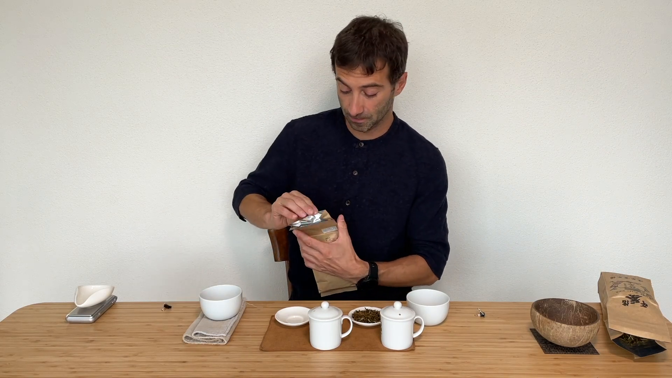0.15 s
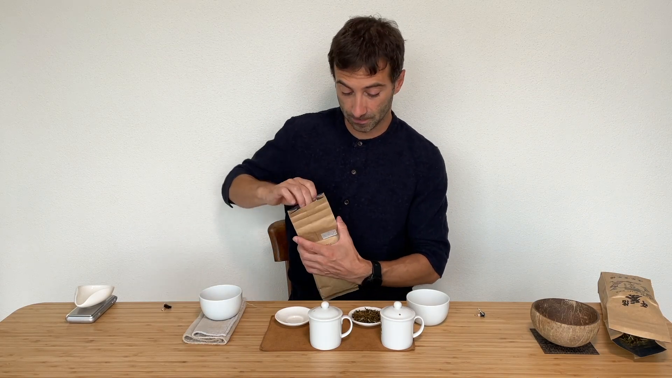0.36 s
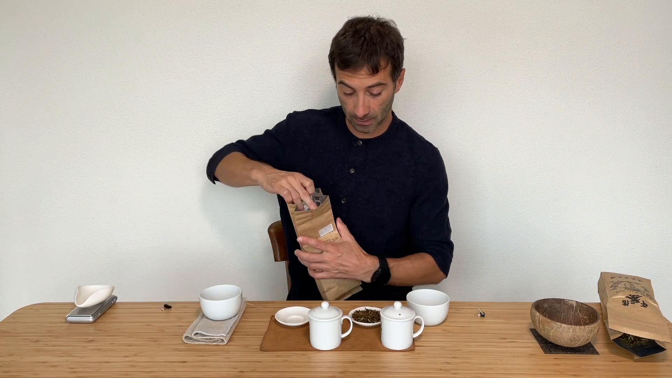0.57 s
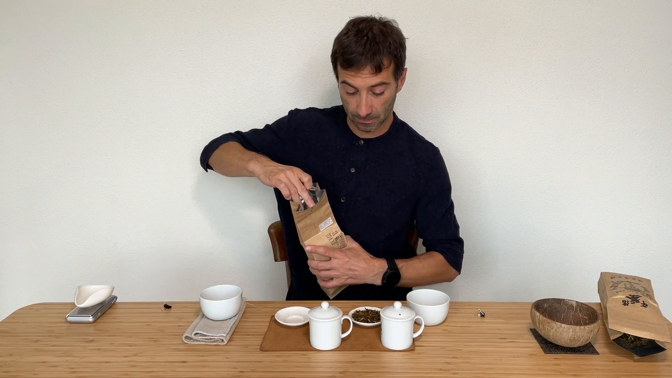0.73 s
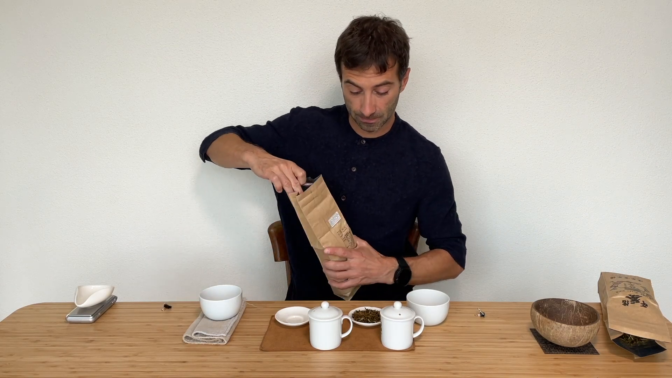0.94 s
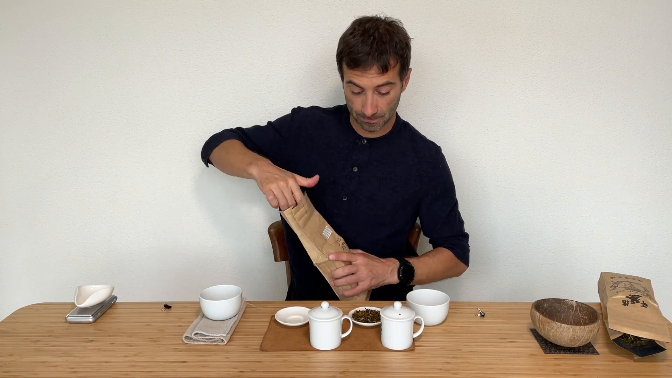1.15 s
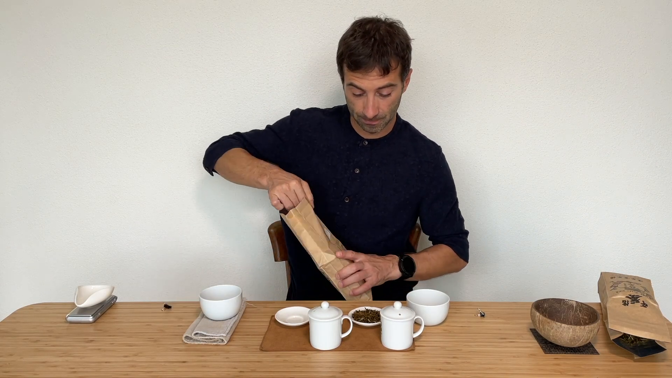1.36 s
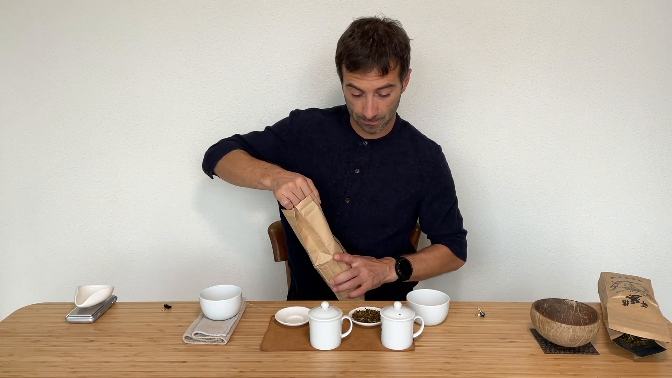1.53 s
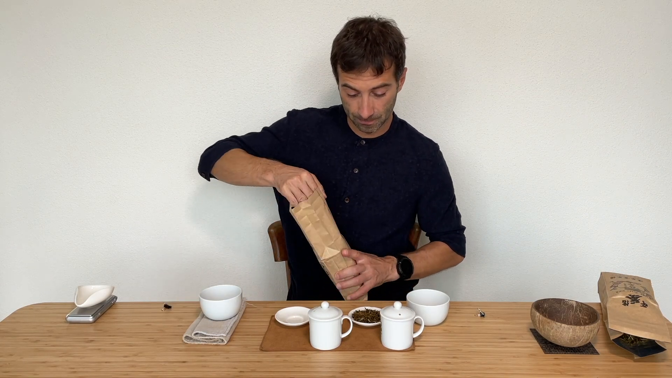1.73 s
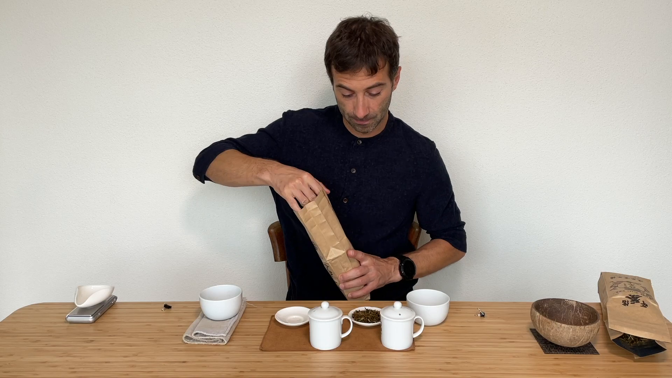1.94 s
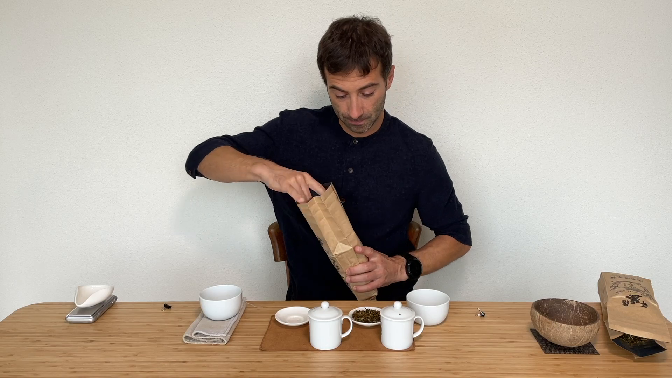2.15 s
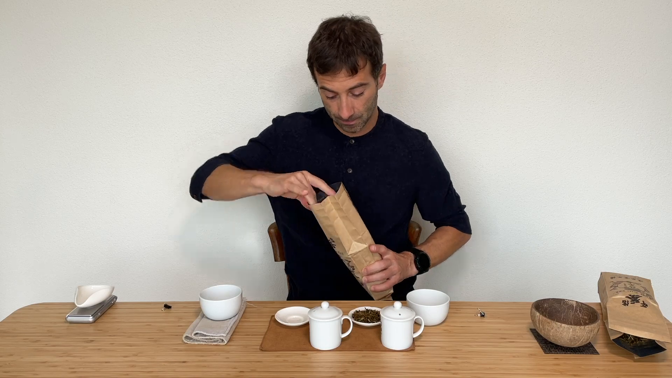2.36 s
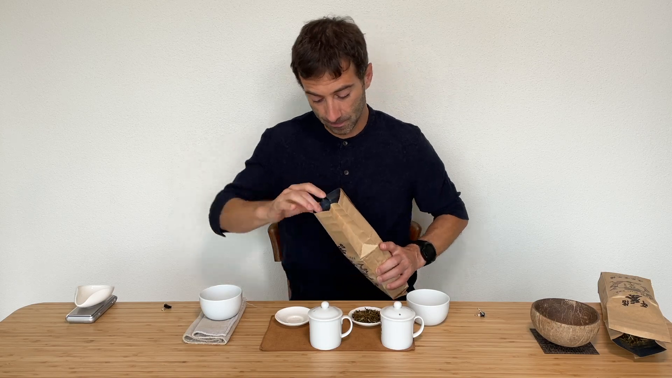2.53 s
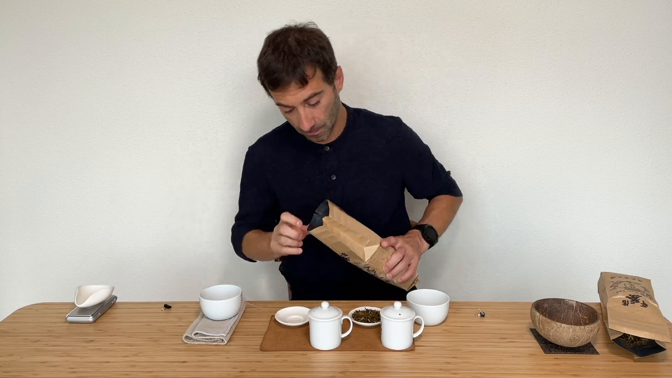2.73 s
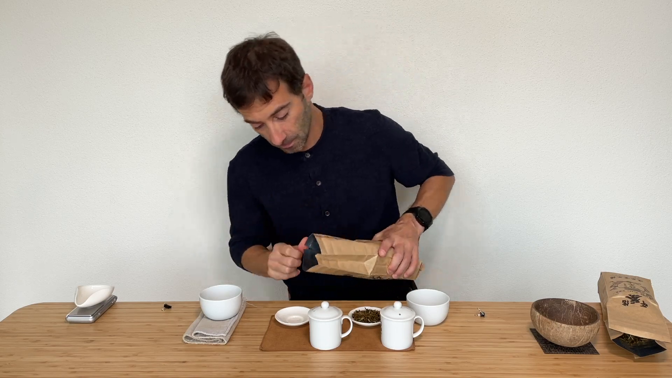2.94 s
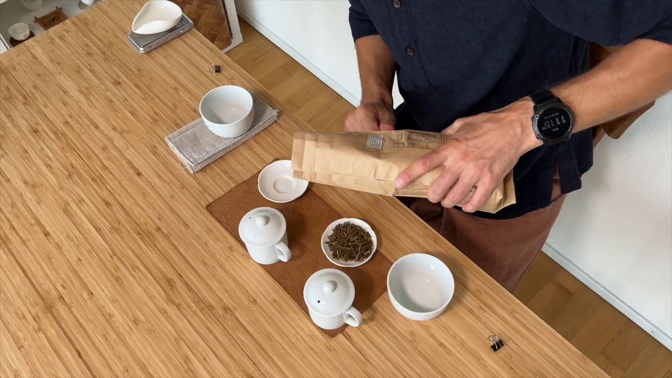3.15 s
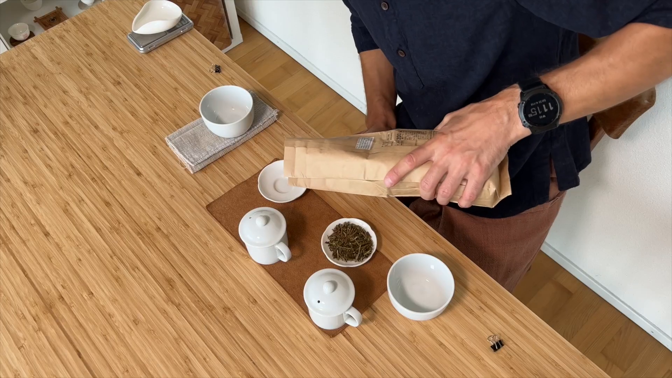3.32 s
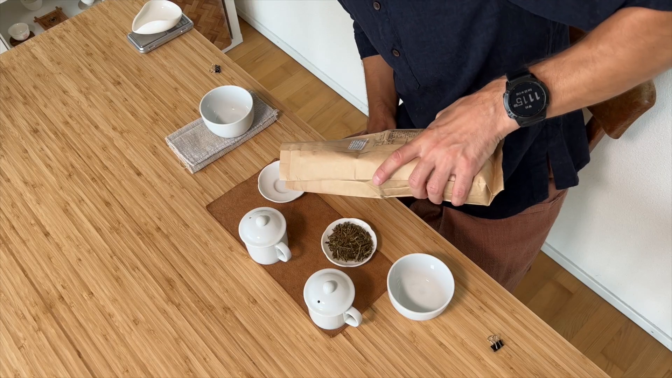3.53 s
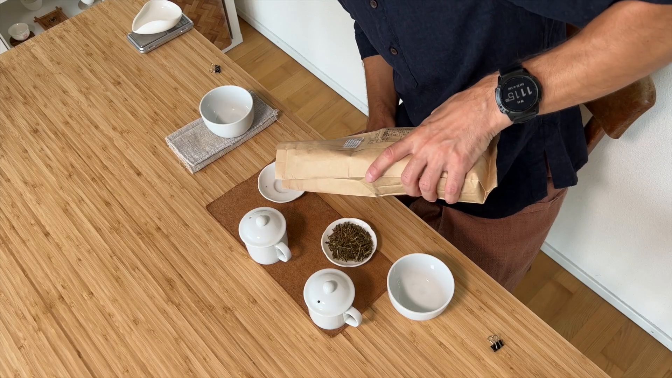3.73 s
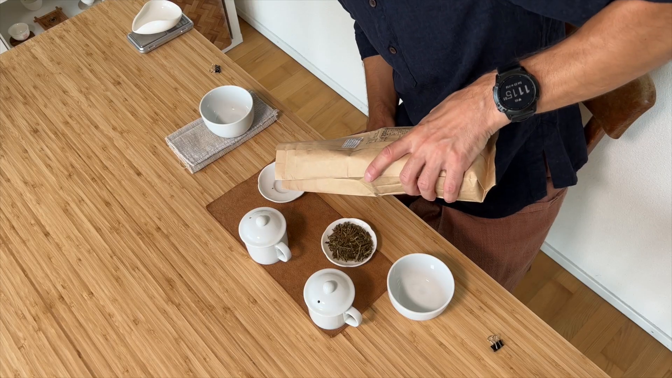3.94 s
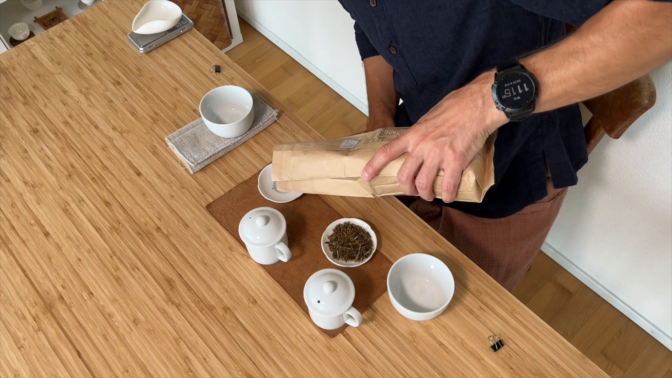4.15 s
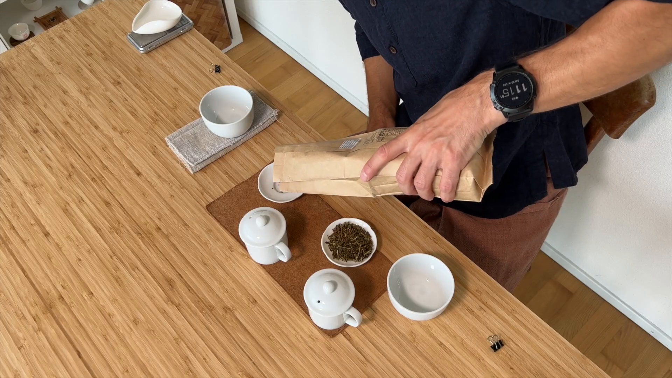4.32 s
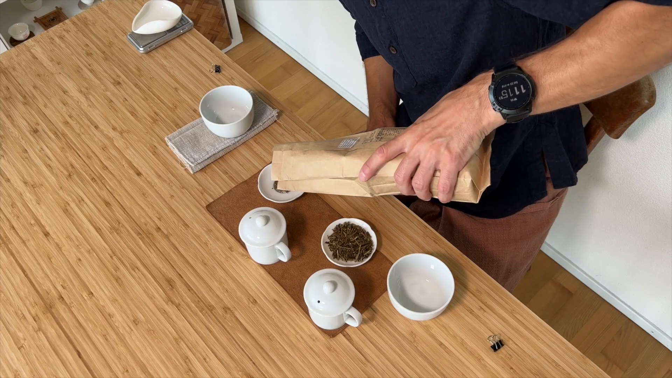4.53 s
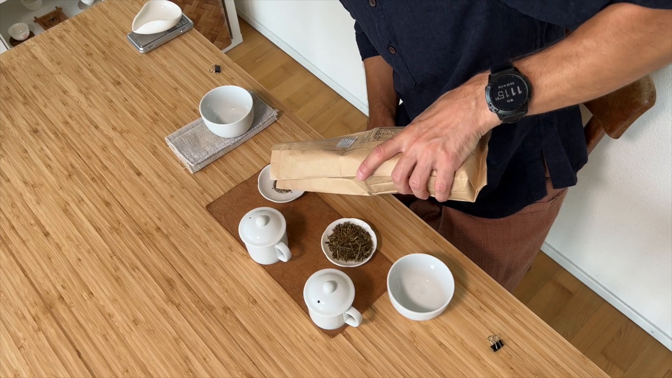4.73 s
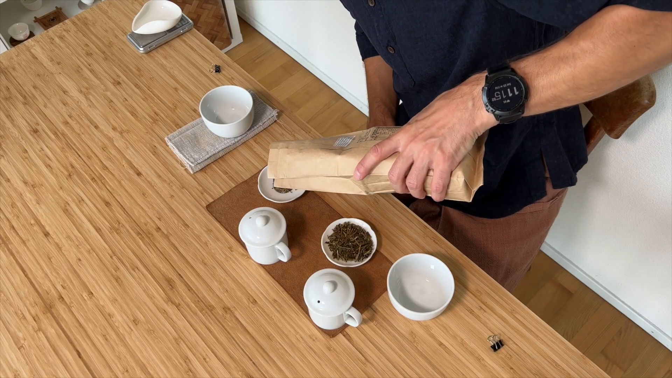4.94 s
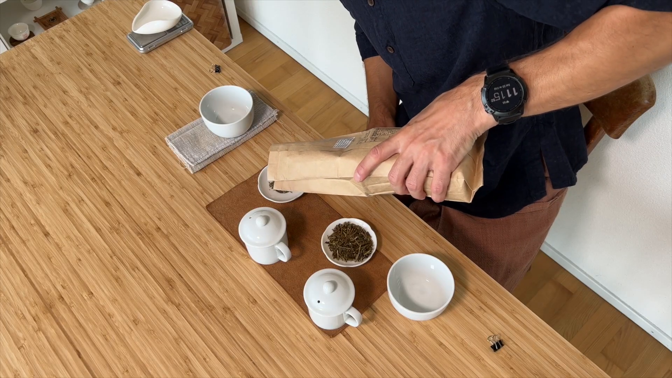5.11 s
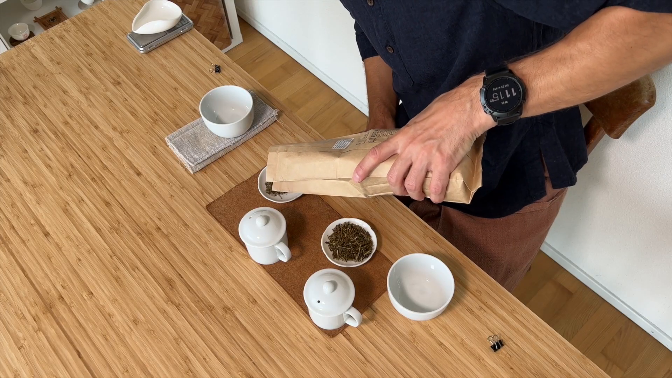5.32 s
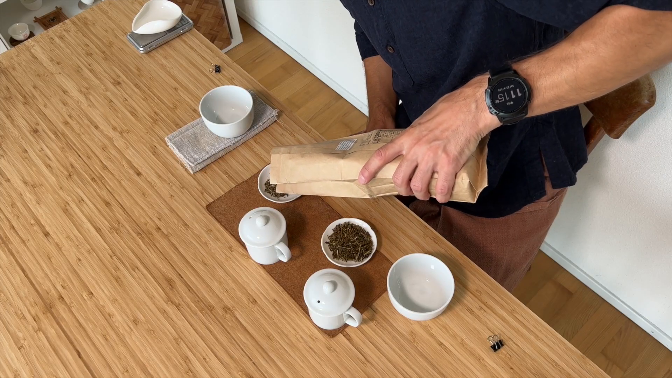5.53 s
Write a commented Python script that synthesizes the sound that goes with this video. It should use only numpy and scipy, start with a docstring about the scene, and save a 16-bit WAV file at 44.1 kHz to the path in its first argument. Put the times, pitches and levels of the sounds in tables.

```python
"""A stiff paper bag of dry tea leaves is unrolled and pulled open at a table in a bare room.
Creases snap in short noise bursts, panels flex and rustle in many tiny ticks, and echoes follow.
Then the bag is tipped: leaves slide down the paper and are shaken out in quick strokes, made of
finer ticks that surge with each movement. A low hum and faint noise lie underneath."""
import sys
import numpy as np
from scipy import signal
from scipy.fft import rfft, irfft
from scipy.io import wavfile

SR = 44100
rng = np.random.default_rng(int(sys.argv[2]) if len(sys.argv) > 2 else 0)


def file_out(sig):
    """Save sig as 16-bit WAV at sys.argv[1]."""
    # one column per channel
    cols = np.atleast_2d(sig).T
    # limit, then scale
    lim = np.clip(cols, -1, 1)
    pcm = np.round(lim * 32767).astype(np.int16)
    wavfile.write(sys.argv[1], SR, pcm)


N = 250311
TIME = np.arange(N) / SR
MOVE_RISE_S, MOVE_FALL_S = 0.025, 0.059


def amp(db):
    """Decibels to gain."""
    return 10 ** (np.asarray(db) / 20)


def evened(x):
    """Scales to an rms (average strength) of 1."""
    return x / np.sqrt(np.mean(x ** 2) + 1e-20)


def read(points, hz):
    """Reads a table at any pitch, with straight lines between points on a log-frequency axis."""
    f, value = np.transpose(points)
    return np.interp(np.log(hz + 1), np.log(f), value)


def add(mix, s, sound):
    """Mixes a sound in at s seconds."""
    part = mix[max(round(s * SR), 0):][:len(sound)]
    part += sound[:len(part)]


def colour(x, points, tilt_db=0, size=2048):
    """Filters without pre-echo to the given spectrum, tilted about 4 kHz by dB per octave."""
    hz = np.fft.rfftfreq(size, 1 / SR)
    octaves = np.log2(np.maximum(hz, 1500) / 4000)  # the tilt stays level below 1500 Hz
    cepstrum = irfft(np.log(amp(read(points, hz) + tilt_db * octaves)))
    # folding the cepstrum forward makes the filter respond as early as it can
    cepstrum[1:size // 2] *= 2
    cepstrum[size // 2 + 1:] = 0
    response = irfft(np.exp(rfft(cepstrum)))
    return signal.oaconvolve(x, response)[:len(x)]


def burst(decay_s, size=4096):
    """A dying flurry of tiny slips with energy 1 and a nearly even spectrum."""
    fade = np.exp(-np.arange(size) / SR / decay_s)
    spectrum = rfft(rng.standard_normal(size) * fade)
    flurry = irfft(spectrum / abs(spectrum)) * np.sqrt(fade)
    return flurry / np.linalg.norm(flurry)


def ring(hz, cycles, size=4096):
    """A damped swing of a small wrinkle or leaf, peak near 1."""
    turns = hz * np.arange(size) / SR
    return np.sin(2 * np.pi * turns) * np.exp(-turns / cycles)


def wander(rate_hz):
    """Slow random drift with an rms of 1."""
    hz = np.fft.rfftfreq(N, 1 / SR)
    slow = rfft(rng.standard_normal(N)) * np.exp(-(hz / rate_hz) ** 2)
    return evened(irfft(slow, N))


def grains(per_s, spread_db, cycles, low_hz, high_hz, count=28):
    """Random ticks of many pitches and sizes, a few much larger than the rest; rms 1."""
    out = np.zeros(N)
    for hz in np.geomspace(low_hz, min(high_hz, SR / 2), count):
        sizes = amp(spread_db * np.minimum(rng.exponential(1, N), 4)) * rng.choice([-1, 1], N)
        clicks = sizes * (rng.random(N) < per_s / count / SR)
        out += signal.oaconvolve(clicks, hz * ring(hz, cycles, size=1024))[:N]
    return evened(out)


def gesture(start_s, hold_s, rise_s, fall_s):
    """One movement's strength: a straight rise, then a fading that begins hold_s after the start."""
    t = TIME - start_s
    return np.clip(t / rise_s, 0, 1) * np.exp(-np.maximum(t - hold_s, 0) / fall_s)


def together(parts):
    """Level of several unrelated sounds at once, adding the powers of (level_db, shape) pairs."""
    return np.sqrt(sum((amp(db) * shape) ** 2 for db, shape in parts))


# balance of low and high in the faint room noise: (pitch_hz, level_db)
AIR_COLOUR = [(15, 0), (35, 2), (60, 2.5), (90, -2.5), (125, 3), (155, -5), (200, -8), (400, -15),
              (1200, -22), (3000, -31), (8000, -32.5), (16000, -36.5)]


def background(hum_hz=64.5, width_hz=5, hum_db=-55, air_db=-60):
    """A low hum, wavering in strength and phase, over faint room noise."""
    waver = wander(width_hz) + 1j * wander(width_hz)
    drone = waver * np.exp(2j * np.pi * hum_hz * TIME)
    hum = evened(drone.real)
    air = evened(colour(rng.standard_normal(N), AIR_COLOUR))
    return amp(hum_db) * hum + amp(air_db) * air


# each move of the fingers on the paper: (start_s, length_s, bending_db, rubbing_db)
MOVES = [(.07, 0.052, -59, -56), (.26, 0.12, -52.5, -59), (.43, 0.46, -55, -52), (1.07, 0.37, -47, -55.5),
         (1.4, 0.2, -47.5, -73), (1.68, .26, -49, -57.5), (2.03, 0.12, -46, -50), (2.35, 0.068, -47, -56),
         (2.68, 0.11, -69, -66.5)]
# the holding hand stirs the paper between these times
GRIP_START_S, GRIP_END_S = 0, 2.29
GRIP_BEND_DB, GRIP_RUB_DB = -59.5, -61
# balance of low and high in bending paper: (pitch_hz, level_db)
BEND_COLOUR = [(40, -22), (130, 3), (280, -5.5), (450, 5), (750, -1.5), (1300, 3), (2200, -9.5),
               (4000, -18.5), (8000, -29), (16000, -25)]
# balance of low and high in rubbing paper: (pitch_hz, level_db)
RUB_COLOUR = [(300, -32), (1500, -1.5), (3500, 2), (6000, 1), (9000, -0.5), (12500, -0.5), (16000, -4)]
# balance of low and high in cracks, small wrinkles and scratches: (pitch_hz, level_db)
CRACK_COLOUR = [(100, -18.5), (600, -11.5), (1500, -1.5), (2500, -1), (4000, 2.5), (7500, -6), (12000, -12),
                (16000, -21.5)]


def rustle(bend_level_db=-3, rub_level_db=0, crinkle_level_db=-12):
    """Bending paper crackles low and coarse, small wrinkles tick, and rubbing paper hisses in fine grains."""
    grip = (GRIP_START_S, GRIP_END_S - GRIP_START_S, GRIP_BEND_DB, GRIP_RUB_DB)
    moves = MOVES + [grip]
    shapes = [gesture(s, length_s, MOVE_RISE_S, MOVE_FALL_S) for s, length_s, _, _ in moves]
    _, _, bend_db, rub_db = np.transpose(moves)

    bend_ticks = grains(per_s=700, spread_db=3.0, cycles=1.9, low_hz=127.3, high_hz=7940)
    bend = evened(colour(bend_ticks, BEND_COLOUR))
    wrinkle_ticks = grains(per_s=150, spread_db=2.5, cycles=1.6, low_hz=900, high_hz=9000)
    crinkle = evened(colour(wrinkle_ticks, CRACK_COLOUR, tilt_db=-2))
    rub_ticks = grains(per_s=7000, spread_db=1.5, cycles=1.5, low_hz=1450, high_hz=16000)
    rub = evened(colour(rub_ticks, RUB_COLOUR))

    bending = amp(bend_level_db) * bend + amp(crinkle_level_db) * crinkle
    bend_strength = together(zip(bend_db, shapes))
    rub_strength = together(zip(rub_db + rub_level_db, shapes))
    return bend_strength * bending + rub_strength * rub


def facet(hz, cycles, relax=0.12, overtone=1.562, overtone_db=-10, size=4096):
    """A buckled patch of paper swings in two modes; its pitch sinks as the stress lets go."""
    swings = hz * np.arange(size) / SR
    # the pitch starts a little above hz and sinks to a little below
    turns = swings + relax * cycles * (1 - np.exp(-swings / cycles)) - relax / 2 * swings
    main = np.sin(2 * np.pi * turns)
    second = amp(overtone_db) * np.sin(2 * np.pi * overtone * turns)
    return (main + second) * np.exp(-swings / cycles)


# the louder creases giving way; the tilt brightens (+) or dulls (-) the crack:
# (start_s, crack_db, tilt_db_per_octave, panel_flex_db, facet_pitch_hz)
SNAPS = [ (0.09, -22.5, 3, -22, 1540), (0.1136, -11, 1, -5, 2180), (0.1794, -11, 8.5, -16, 3420),
         (0.3967, -10, -9.5, 1, 695), (.4010, -10, -4, -2, 2550), (.4911, -10.5, 5.5, -0.5, 890),
         (0.5077, -6.5, -0.5, -8, 3600), (.5180, -14, 3, -1, 1310), (0.5255, -.5, -2, -2, 3090),
         (0.5446, -15, 7, -6, 880), (.5600, -10, 1, -3, 1640), (.6776, -13, -4.5, -7, 1350),
         (.7547, -17, -8, 2.5, 1410), (0.7632, 3.5, -3, 0, 2300), (0.7688, -1, -1, 10.5, 1670),
         (.7723, -2, 0, 8.5, 1300), (.8180, -6, 1.5, -3, 880), (.8220, -5.5, -2, -11, 568),
         (0.8375, -7.5, 4.5, -0.5, 392), (0.843, -5.5, 2.5, -1.5, 4800), (.8588, -4, -2.5, -2, 2400),
         (1.0956, -23, 2, -8, 770), (1.1988, -12.5, -5, -11, 880), (1.3325, 3, 2, -1.5, 934),
         (1.343, -3.5, 5, -1, 502), (1.3565, 1, -1.5, 5.5, 1850), (1.4133, -0.5, 0, -1.5, 4700),
         (1.451, -11, -9, -3, 740), (1.5453, -23, -11, -6.5, 1000), (1.7102, -13, 1, -5, 1130),
         (1.7266, -11, 4.5, 4.5, 950), (1.7442, -21, 3.5, 2.5, 1250), (1.7630, -7.5, -10, 2.5, 1690),
         (1.8096, -6, -3, -7, 3850), (1.9904, -3, -5, -4.5, 726), (2.0825, -9.5, -5, 3, 748),
         (2.103, -12.5, 4, 2.5, 1700), (2.1304, -16, -3, 0, 1450), (2.2140, -20, -11, 1, 1790),
         (2.4259, -19, -12, -14, 1610), (4.135, -54, 0, -13, 970)]
# a stiff panel at the mouth flips over with a pitched pop: (start_s, level_db, pitch_hz)
POPS = [(0.1795, -18, 3500), (.18, -22.5, 1780), (2.4261, -24, 1200), (2.4272, -24.5, 1700)]
# balance of low and high in a flexing panel: (pitch_hz, level_db)
FLEX_COLOUR = [(40, -33), (130, -4), (280, -2.5), (480, 0), (720, 2.5), (1100, -3), (2000, -4.5),
               (4000, -19.5), (10000, -38)]
# the facet's ring, relative to the crack and to the flex that drive it; the louder result counts
RING_DB, RING_FLEX_DB = -23, -29.5


def snaps(crack_s=0.0017, softness_db=11, flex_s=0.0057, ring_cycles=3, slip_gap_s=0.003, slip_db=-13, count=4):
    """A crease buckles with a crack, the facet beside it rings, the panel flexes, and smaller slips follow."""
    out = np.zeros(N)
    for s, crack_db, tilt_db, flex_db, hz in SNAPS:
        # soft folds give way slowly
        length_s = crack_s * np.clip(np.exp((flex_db - crack_db) / softness_db), 0.6, 3)
        crack = colour(burst(length_s), CRACK_COLOUR, tilt_db)
        add(out, s, amp(crack_db) * crack)
        flex = colour(burst(flex_s), FLEX_COLOUR)
        add(out, s, amp(flex_db) * flex)
        ring_db = max(crack_db + RING_DB, flex_db + RING_FLEX_DB)
        add(out, s, amp(ring_db) * facet(hz, ring_cycles))

        slip_times = np.cumsum(slip_gap_s * rng.uniform(0.3, 1.8, count))
        for k, late_s in enumerate(slip_times):
            slip = colour(burst(2 * length_s), CRACK_COLOUR, tilt_db)
            add(out, s + late_s, amp(crack_db + slip_db - 2 * k) * slip)
    for s, db, hz in POPS:
        add(out, s, amp(db) * facet(hz, ring_cycles))
    return out


def settling(level_db=-42, decay_s=0.043):
    """Small wrinkles crackle on for a moment after each snap, in step with how hard it cracked."""
    stress = together((crack_db, gesture(s, 0, MOVE_RISE_S / 10, decay_s)) for s, crack_db, *_ in SNAPS)
    crackle = grains(per_s=260, spread_db=3.2, cycles=1.1, low_hz=800, high_hz=9800)
    return amp(level_db) * stress * evened(colour(crackle, CRACK_COLOUR))


# the bag bulges; the push is relative, raised by push_level_db below:
# (start_s, air_push_db, low_boom_db, hollow_pitch_hz, hollow_db)
PUFFS = [(.113, -41, -51, 458, -52.5), (.5, -30, -47, 469, -51), (.765, -22.5, -44.5, 710, -33.5),
         (.825, -32, -48, 502, -42), (1.094, -34, -59, 394, -47.5), (1.34, -27, -36.5, 966, -42),
         (1.47, -43, -44, 787, -42), (1.718, -25.5, -39, 610.6, -30), (1.8, -48, -52, 850, -45),
         (2.082, -33, -51, 821, -38), (4.112, -41.5, -62, 327, -56), (4.42, -46, -61, 238, -61)]
# balance of low and high in the push of air: (pitch_hz, level_db)
PUFF_COLOUR = [(12, -30), (25, -9), (45, 2), (90, -4), (135, 5), (200, 2.5), (300, -1), (600, -20.5),
               (2000, -57)]


def puffs(push_s=0.022, push_level_db=33, boom_hz=134, boom_s=0.018, hollow_s=0.012, hollow_waver=0.079):
    """Each bulge pushes air, booms low and sounds the bag's hollow; the pitches waver as the walls move."""
    out = np.zeros(N)
    t = TIME[:SR // 2]
    # both tones swell to a peak at these times, then die away
    boom_shape = t / boom_s * np.exp(1 - t / boom_s)
    hollow_shape = t / hollow_s * np.exp(1 - t / hollow_s)
    for s, push_db, boom_db, hollow_hz, hollow_db in PUFFS:
        push = amp(push_db + push_level_db) * colour(burst(push_s, size=len(t)), PUFF_COLOUR)
        wavering_s = np.cumsum(1 + hollow_waver * wander(rate_hz=122)[:len(t)]) / SR
        boom = np.sin(2 * np.pi * boom_hz * wavering_s) * boom_shape
        hollow = np.sin(2 * np.pi * hollow_hz * wavering_s) * hollow_shape
        add(out, s, push + amp(boom_db) * boom + amp(hollow_db) * hollow)
    return out


# a heap of leaves breaks loose in the tipped bag and runs out; fizz is relative to flow:
# (start_s, flow_db, extra_fizz_db, run_out_s)
SLIDES = [(2.857, -47, -4, .06), (2.93, -46.5, -2, .11), (3.03, -54, -3, 0.56), (3.235, -53.5, 2.5, .16),
          (3.555, -53.5, 3.5, 0.28), (3.685, -53, -0.5, 0.23), (4.155, -51, -10, 0.16)]
SLIDE_RISE_S, SLIDE_HOLD_S = 0.022, 0.023
TRICKLE_DB, TRICKLE_FIZZ_DB = -63, -10  # leaves keep trickling from the first slide on
# each shake of the wrist throws the leaves forward: (peak_s, level_db)
SHAKES = [(4.095, -57.5), (4.223, -46.5), (4.324, -47.5), (4.417, -52.5), (4.515, -63), (4.615, -58),
          (4.723, -54), (4.822, -58.5), (4.925, -57), (5.025, -60), (5.136, -55), (5.247, -54),
          (5.34, -56.5), (5.453, -53.5), (5.665, -54)]
# single stems striking paper or dish: (start_s, level_db, pitch_hz)
TICKS = [(2.855, -38, 4800), (3.051, -30, 8000), (3.134, -34, 6000), (3.158, -34, 4270), (3.255, -37, 4200),
         (3.572, -30.5, 10000), (3.599, -32, 11000), (3.6236, -26, 10000), (4.044, -39, 4400),
         (4.2234, -23, 9400), (4.23, -29, 4250), (4.6749, -32.5, 4200)]
# balance of low and high in leaves scraping paper: (pitch_hz, level_db)
SCRAPE_COLOUR = [(100, -24), (300, -15), (650, -7), (900, -4.5), (1250, 0.5), (2200, -4), (3000, -1),
                 (3900, -0.5), (5500, -8), (7000, -4.5), (10000, -31), (16000, -20)]
# balance of low and high in leaves rubbing each other: (pitch_hz, level_db)
FIZZ_COLOUR = [(1500, -23), (4500, -5), (7000, -3.5), (9300, 1), (11700, -1.5), (13500, -6), (16000, -10.5)]


def leaves(level_db=-1, shake_s=0.023, shake_fizz_db=2.5, tick_cycles=2.2, scratch_db=2, stem_db=-7.0):
    """Dry leaves scrape the paper and fizz against each other, surging with every slide and shake."""
    trickle = (SLIDES[0][0], TRICKLE_DB, TRICKLE_FIZZ_DB, np.inf)
    slides = SLIDES + [trickle]
    shapes = [gesture(s, SLIDE_HOLD_S, SLIDE_RISE_S, run_out_s) for s, _, _, run_out_s in slides]
    _, flow_db, fizz_db, _ = np.transpose(slides)
    flow = together(zip(flow_db, shapes))
    fizzing = together(zip(flow_db + fizz_db, shapes))

    # a smooth hump for each shake, at half height shake_s either side of its peak
    surge = sum(amp(db) / (1 + ((TIME - s) / shake_s) ** 2) for s, db in SHAKES)
    spray = amp(shake_fizz_db) * surge * (surge / surge.max()) ** 0.38  # hard shakes are brighter

    scrape_ticks = grains(per_s=9000, spread_db=2.0, cycles=2.3, low_hz=296, high_hz=14070)
    scrape = evened(colour(scrape_ticks, SCRAPE_COLOUR))
    fizz_ticks = grains(per_s=5400, spread_db=1.5, cycles=1.6, low_hz=3940, high_hz=15900)
    fizz = evened(colour(fizz_ticks, FIZZ_COLOUR))
    stems = grains(per_s=150, spread_db=3.5, cycles=0.8, low_hz=3500, high_hz=11000)

    out = scrape * np.hypot(flow, surge)
    out += fizz * np.hypot(fizzing, spray)
    out += amp(stem_db) * flow * stems
    out *= amp(level_db + 1.08 * wander(rate_hz=43))  # the leaves move in clumps
    for s, db, hz in TICKS:
        scratch = colour(burst(decay_s=0.0006), CRACK_COLOUR, tilt_db=8)
        add(out, s, amp(db) * (ring(hz, tick_cycles) + amp(scratch_db) * scratch))
    return out


# how long echoes take to die by 60 dB: (pitch_hz, time_s)
ROOM_T60 = [(130, 0.56), (300, 0.5), (700, 0.72), (1700, 0.57), (4500, 0.69), (9000, 0.5), (16000, 0.03)]
# how loud the echoes are: (pitch_hz, level_db)
ROOM_GAIN = [(60, 3.5), (135, 4.5), (300, -1), (700, 1), (1700, -1), (4500, -7), (9000, -7.5), (16000, -17)]


def tail(gap_s=0.0033, build_s=0.0022):
    """Dense echoes from bare walls: noise with each band dying at its own speed, after a short gap."""
    hz, t, bands = signal.stft(rng.standard_normal(SR), SR, nperseg=256)
    decay_s = read(ROOM_T60, hz)[:, None] / np.log(1000)  # 60 dB is a factor of 1000
    even_energy = np.sqrt(2 / (decay_s * SR))
    gain = amp(read(ROOM_GAIN, hz))[:, None]
    bands = bands * np.exp(-t / decay_s) * even_energy * gain
    echoes = signal.istft(bands, SR, nperseg=256)[1][:SR]
    late_s = np.maximum(TIME[:SR] - gap_s, 0)
    return echoes * (1 - np.exp(-late_s / build_s))


def room(x, count=4):
    """Several echo tails of the same bare room, mixed in slowly drifting shares of steady total power."""
    shares = np.array([wander(rate_hz=8.0) for _ in range(count)])
    shares /= np.linalg.norm(shares, axis=0)
    return sum(signal.oaconvolve(x * share, tail())[:N] for share in shares)


def scene(snap_wet_db=-0.65, rustle_wet_db=-3, leaves_wet_db=-5, puff_wet_db=-5):
    """The bag and the leaves, heard directly and through the room, over the background."""
    sources = [
        (snaps(), snap_wet_db),
        (rustle() + settling(), rustle_wet_db),
        (leaves(), leaves_wet_db),
        (puffs(), puff_wet_db),
    ]
    direct = sum(x for x, _ in sources)
    echoes = room(sum(amp(wet_db) * x for x, wet_db in sources))
    return (direct + echoes + background())[None]


def record(dry, edge_hz=15900):
    """A steep filter removes the treble above edge_hz."""
    lowpass = signal.firwin(401, edge_hz, window=("kaiser", 8), fs=SR)
    return signal.oaconvolve(dry, lowpass[None], "same")


dry = scene()
out = record(dry)
file_out(out)
```